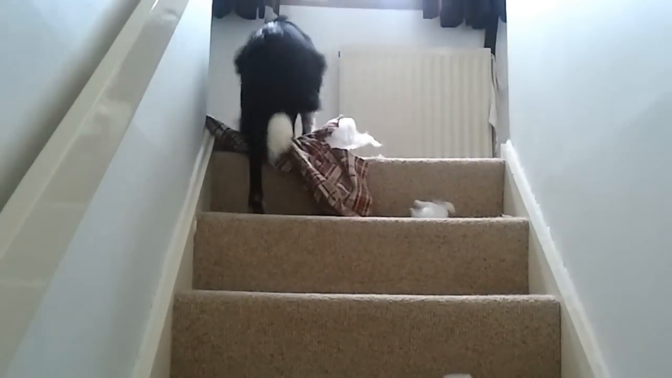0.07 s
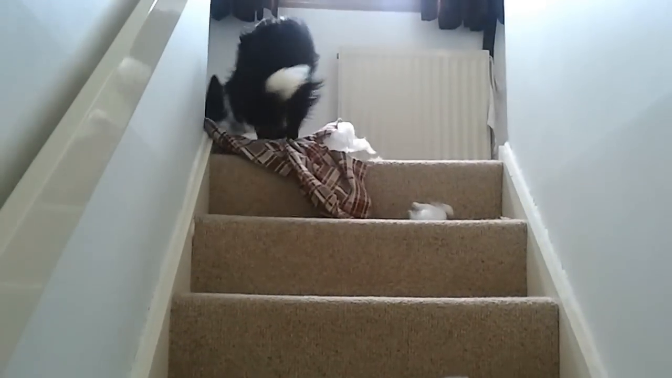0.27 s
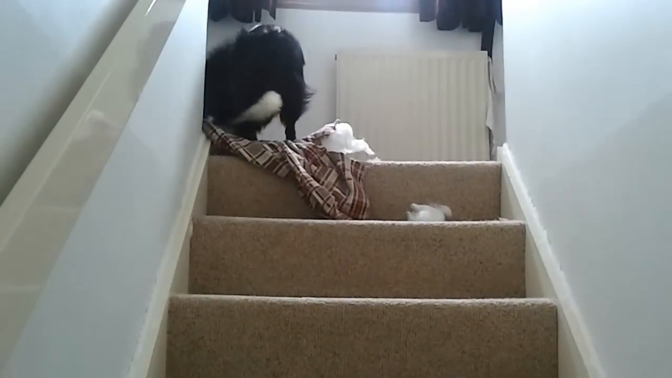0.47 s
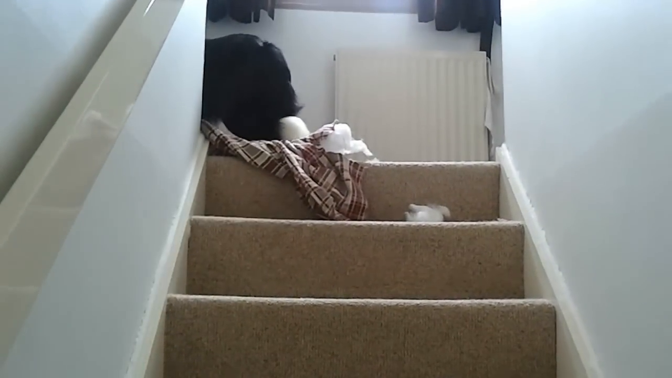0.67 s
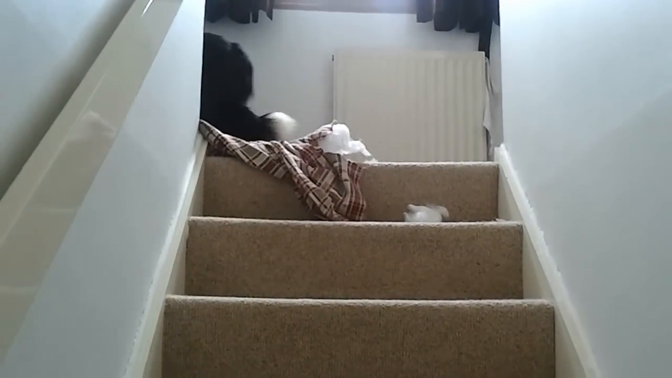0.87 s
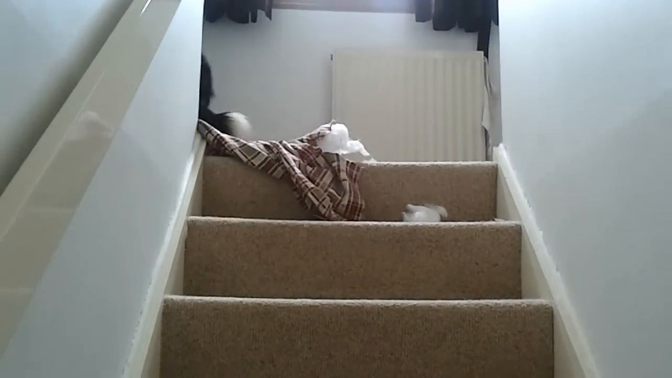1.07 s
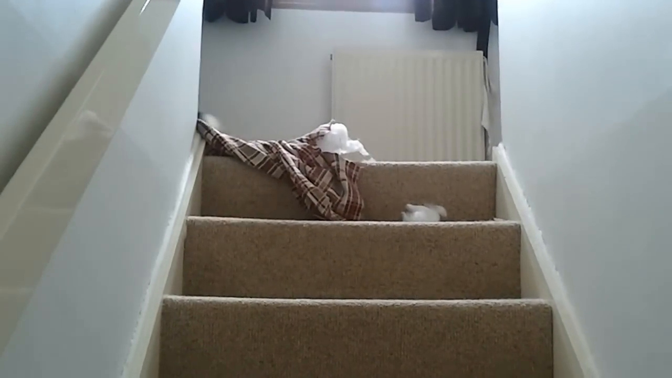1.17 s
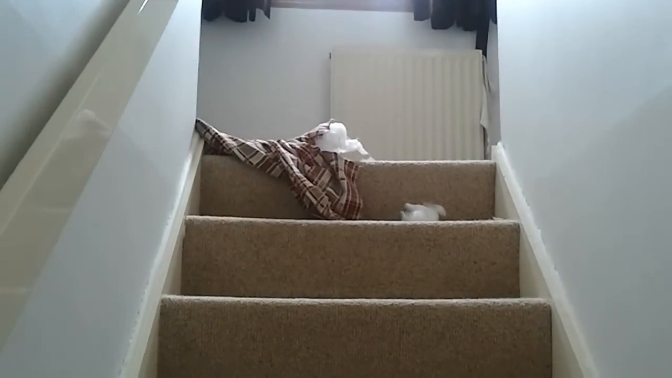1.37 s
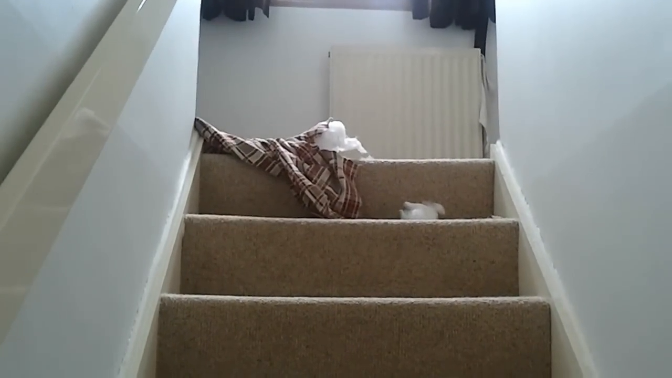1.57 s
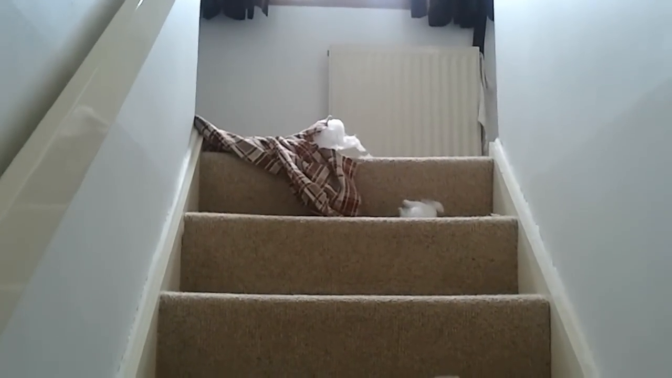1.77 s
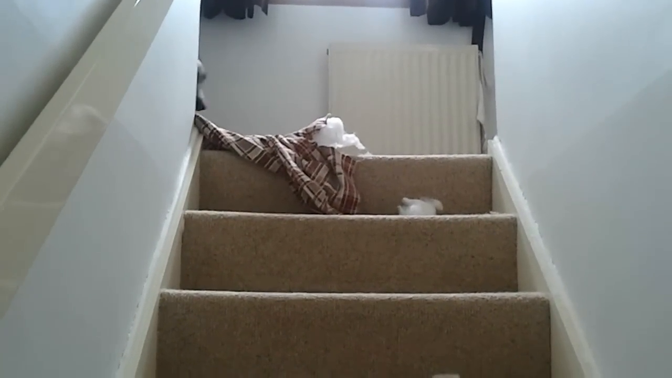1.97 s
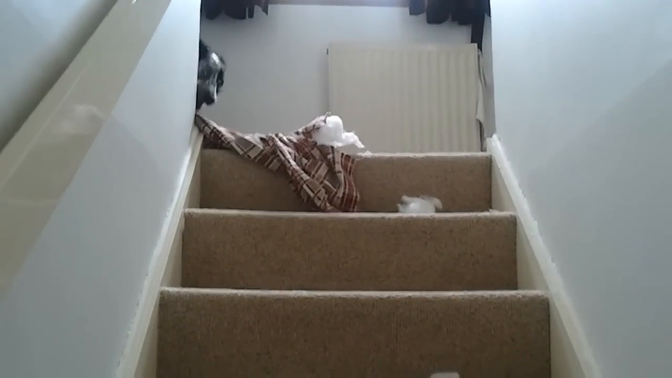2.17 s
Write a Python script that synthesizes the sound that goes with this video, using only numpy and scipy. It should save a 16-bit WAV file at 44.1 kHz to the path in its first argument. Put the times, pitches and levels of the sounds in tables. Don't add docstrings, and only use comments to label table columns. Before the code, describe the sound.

A dog's paws knock hollowly on carpeted wooden stairs in a fast cluster with claw scrapes, then soft muffled pads continue around a corner, in a quiet stairwell with steady faint microphone hiss.

```python
import sys
import numpy as np
from scipy import signal
from scipy.fft import rfft, irfft
from scipy.io import wavfile

SR = 44100
rng = np.random.default_rng(int(sys.argv[2]) if len(sys.argv) > 2 else 0)


def gain_from_db(level_db):
    decades = np.asarray(level_db, float) / 20
    return 10 ** decades


def to_wav(s):
    ch = np.atleast_2d(s).T
    pcm = np.round(np.clip(ch, -1, 1) * 32767)
    wavfile.write(sys.argv[1], SR, pcm.astype(np.int16))


N = 97020
STEP_COUNT = 20000
CLAW_LEAD_S = 0.003
CLAW_WET_DB = -7


def read(points, hz):
    f, value = np.transpose(points)
    return np.interp(np.log(hz + 1), np.log(f + 1), value)


def bell(hz, centre_hz, octaves, depth_db):
    return -depth_db * (np.log2(hz / centre_hz) / octaves) ** 2


def add(mix, s, sound):
    part = mix[round(s * SR):][:len(sound)]
    part += sound[:len(part)]


def coloured(count, gain):
    spectrum = rfft(rng.standard_normal(count))
    noise = irfft(spectrum * gain(np.fft.rfftfreq(count, 1 / SR)), count)
    return noise / np.sqrt(np.mean(noise ** 2) + 1e-20)


# frequency in Hz, level in dB per Hz.
HISS_CURVE = [(25, -8), (60, -9), (110, -5), (350, -2), (800, -7), (2000, -10), (6900, -15.5),
              (7800, -27.5)]


def microphone_hiss():
    return gain_from_db(-54) * coloured(count=N, gain=lambda hz: gain_from_db(read(HISS_CURVE, hz)))


# frequency in Hz, level in dB.
CLAW_CURVE = [(1200, 1), (2000, -2.5), (3000, -7), (4400, -5), (6000, -6.5), (7500, -16.5)]


def scratch(claw_db, t):
    scrape = coloured(count=len(t), gain=lambda hz: gain_from_db(read(CLAW_CURVE, hz)) * (hz > 900))
    rise = np.minimum(t / 0.0035, 1) ** 2
    catch = gain_from_db(-60 * t / 0.054)
    drag = gain_from_db(-1 - 60 * t / 0.092)
    return gain_from_db(claw_db) * scrape * rise * (catch + drag)


PAD_OCT = 0.86


def puff(centre_hz, t):
    noise = coloured(count=len(t), gain=lambda hz: gain_from_db(bell(hz + 1, centre_hz, PAD_OCT, 6)))
    burst = noise * gain_from_db(-60 * t / 0.05) * np.minimum(t / 0.0027, 1)
    return burst / np.abs(burst).max()


def push(centre_hz, octaves):
    hz = np.fft.rfftfreq(STEP_COUNT, 1 / SR)
    pulse = np.roll(irfft(gain_from_db(bell(hz + 1, centre_hz, octaves, 6))), shift=150)
    return pulse / pulse.max()


# frequency in Hz, decay time t60 in seconds.
WELL_DECAY = [(100, 0.62), (400, 0.45), (1000, 0.3), (3000, 0.25), (7000, 0.23)]


def stairwell(x):
    taps = np.zeros(len(x))
    at = np.arange(60, len(x) - 20, 20)
    taps[at + rng.integers(0, 20, len(at))] = rng.choice([-1., 1.], len(at))
    hz, t, z = signal.stft(taps, SR, nperseg=256)
    decay = gain_from_db(-60 * t / read(WELL_DECAY, hz)[:, None])
    tail = signal.istft(z * decay, SR, nperseg=256)[1]
    return signal.fftconvolve(x, tail / np.linalg.norm(tail))[:len(x)]


def ring(modes, weight_db, luck, t):
    hz, db, t60 = np.transpose(modes)[:, :, None]
    detune, spot, phase = luck[:len(hz), :, None].transpose(1, 0, 2)
    turn = 2 * np.pi * hz * (1 + 0.0072 * detune) * t + 2 * phase
    size = gain_from_db(db + weight_db + 3.5 * spot)
    modal_sum = (size * gain_from_db(-60 * t / t60) * np.sin(turn)).sum(0)
    return modal_sum / np.linalg.norm(size) / 2


# frequency in Hz, level in dB, decay time t60 in seconds.
TREAD_MODES = [(323, 1.5, 0.079), (370, -16, 0.066), (438, -8.5, 0.15), (500, 7.5, 0.12), (540, 8.5, 0.067),
               (594, 8, 0.089), (684, -18, .06), (800, -22, 0.033), (928, 6, 0.084), (1048, 4, .07),
               (1177, -15, 0.028), (1420, -16, .04), (1800, -13.5, .04), (2000, -12, .04)]
# frequency in Hz, level in dB, t60 in seconds.
HOLLOW_MODES = [(95, -13, .1), (115, -5.5, .14), (142.2, 6.5, 0.11), (176, -1, 0.27)]


def footfall(knock_db, centre_hz, boom_db, claw_db):
    t, luck = np.arange(STEP_COUNT) / SR, rng.standard_normal((14, 3))
    weight_db = bell(np.array(TREAD_MODES)[:, :1], centre_hz, 1.0, 6)
    knock = ring(TREAD_MODES, weight_db, luck, t) * (1 - np.exp(-t / 0.003))
    knock += gain_from_db(-7) * puff(centre_hz, t)
    boom = ring(HOLLOW_MODES, 0, 0 * luck, t) * (1 - np.exp(-t / 0.0038))
    claw = scratch(claw_db, t)
    to_walls = gain_from_db(CLAW_WET_DB) * claw + gain_from_db(knock_db + 6) * push(centre_hz, octaves=1.48)
    out = claw + stairwell(to_walls)
    add(out, CLAW_LEAD_S, gain_from_db(knock_db) * knock + gain_from_db(boom_db) * boom)
    return out


def paws(table, step):
    out = np.zeros(N)
    for s, *row in table:
        add(out, s - CLAW_LEAD_S, step(*row))
    return out


# start in seconds, knock level in dB, knock centre in Hz,
# boom level in dB, claw level in dB.
STAIR_STEPS = [
    (.0683, -24, 777, -41, -42.5),
    (.2235, -12, 523, -11, -25.5),
    (.244, -46, 500, -15.5, -54.5),
    (.3178, -20, 730, -18, -34),
    (.339, -31, 525, -23.5, -45),
]


def paws_on_stairs():
    return paws(STAIR_STEPS, footfall)


# start in seconds, level in dB, frequency in Hz, t60 in seconds.
BOARD_THUDS = [(.069, -34, 941, 0.068), (.07, -48, 175.5, 0.12), (.224, -37, 45, .08),
               (.2245, -23, 965, 0.062), (.225, -22.5, 372, 0.085), (.228, -23.5, 122.4, 0.17),
               (.319, -27.5, 893, 0.042), (.32, -29, 618, 0.064), (.615, -55, 99, 0.17),
               (.742, -43, 622, 0.031), (.745, -49, 90, 0.16), (.946, -52, 540, 0.072),
               (0.952, -54.5, 165.4, 0.15), (0.981, -59, 95, 0.22), (1.018, -44.5, 607, 0.03),
               (1.123, -35.5, 650.5, 0.077), (1.124, -45.5, 192, .25), (1.137, -50, 115, 0.27),
               (1.645, -43, 409.4, 0.17), (1.647, -50, 185, 0.27), (1.668, -53, 111.4, 0.23),
               (2.013, -61.5, 125, 0.23), (2.171, -56.5, 179, 0.24), (2.175, -51, 321, 0.17)]


def joists():
    out, t = np.zeros(N), np.arange(STEP_COUNT) / SR
    for s, db, hz, t60 in BOARD_THUDS:
        swell = 1 - np.exp(-t * hz / 0.81)
        add(out, s, gain_from_db(db - 60 * t / t60) * swell * 2 * np.sin(2 * np.pi * hz * t))
    return out


# length in seconds, level in dB, centre in Hz, width in octaves.
COAT_STROKES = [
    (0.24, -60, 4040, 0.92),
    (0.18, -59, 690, 0.73),
    (.1, -63, 400, 1.2),
    (.05, -55, 5400, 0.54),
]
COAT_TIMES = [
    .68,
    .8,
    1.0,
    2.03,
]


def brushing():
    out, t = np.zeros(N), np.arange(N) / SR
    for s, (length, db, centre_hz, octaves) in zip(COAT_TIMES, COAT_STROKES):
        noise = coloured(count=N, gain=lambda hz: gain_from_db(bell(hz + 1, centre_hz, octaves, 9)))
        out += gain_from_db(db) * noise * np.exp(-((t - s) / (length / 2)) ** 2)
    return out


def padding(knock_db, centre_hz, echo_db, claw_db):
    t = np.arange(STEP_COUNT) / SR
    claw = scratch(claw_db, t)
    to_walls = gain_from_db(CLAW_WET_DB) * claw + gain_from_db(knock_db + echo_db) * push(centre_hz, PAD_OCT)
    out = claw + stairwell(to_walls)
    add(out, CLAW_LEAD_S, gain_from_db(knock_db) * puff(centre_hz, t))
    return out


# start in seconds, pad level in dB, pad centre in Hz,
# echo level over the pad in dB, claw level in dB.
LANDING_STEPS = [(.743, -51.5, 596, 4, -68), (.776, -51.5, 560, 5.5, -69), (.944, -46.5, 513, 10.5, -66),
                 (1.019, -53, 584, 8, -70), (1.045, -54, 800, -11, -91), (1.1222, -31, 603, 12, -46),
                 (1.643, -34, 426, 10, -55.5), (1.778, -70, 370, -9, -73), (2.022, -51.5, 590, 9, -61),
                 (2.171, -43.5, 400, 9, -66), (2.181, -48, 400, 12, -61)]


def paws_on_landing():
    return paws(LANDING_STEPS, padding)


def scene():
    steps = paws_on_stairs() + paws_on_landing()
    return (steps + joists() + brushing() + microphone_hiss())[None]


def low_pass(x):
    return signal.sosfilt(signal.butter(12, 8060, fs=SR, output="sos"), x)


def record(dry):
    bass_cut = signal.butter(2, 49, "high", fs=SR, output="sos")
    thin = signal.sosfilt(bass_cut, dry)
    treble_cut = signal.firwin(201, 7750, window=("kaiser", 9), fs=SR)
    narrow = signal.oaconvolve(thin, treble_cut[None], "same")
    return low_pass(narrow)


dry = scene()
out = record(dry)
to_wav(out)
```